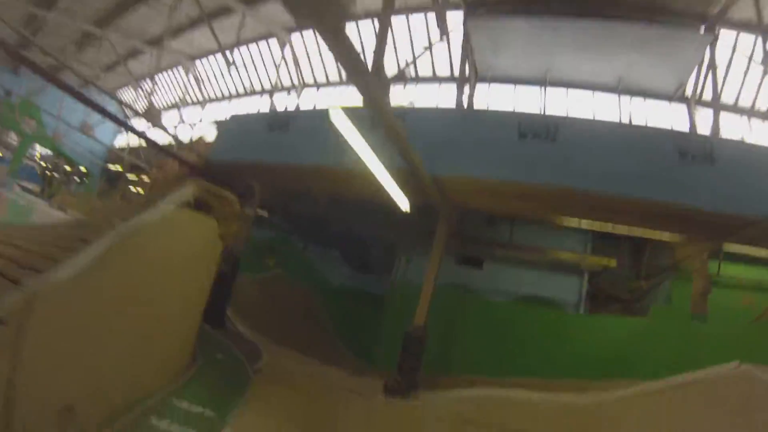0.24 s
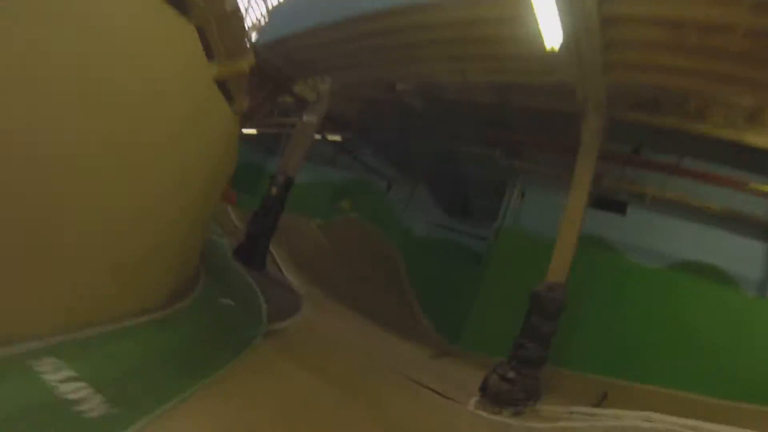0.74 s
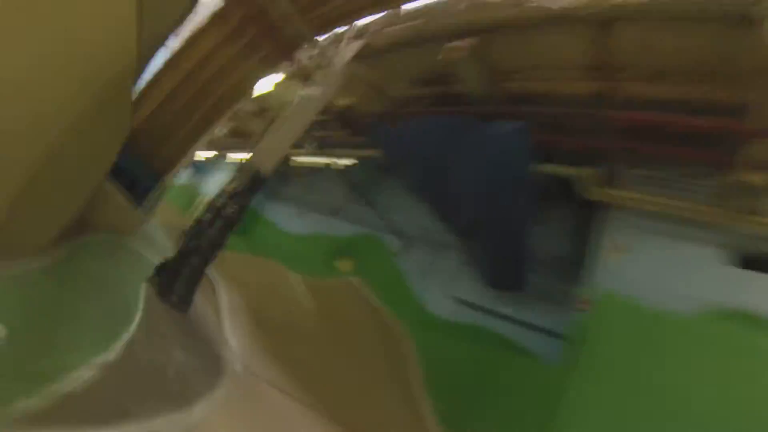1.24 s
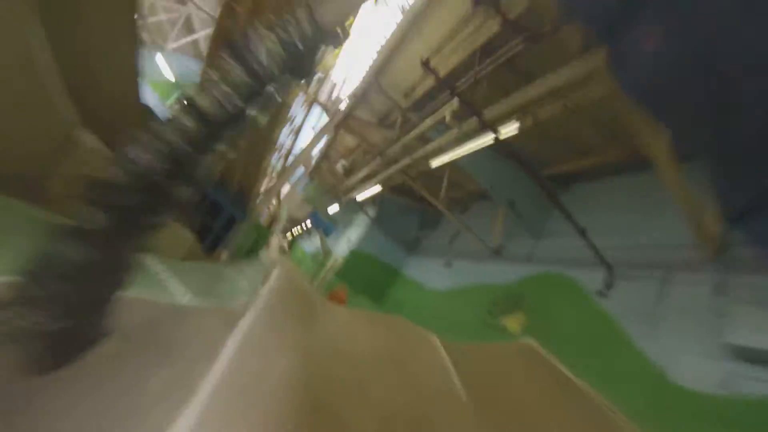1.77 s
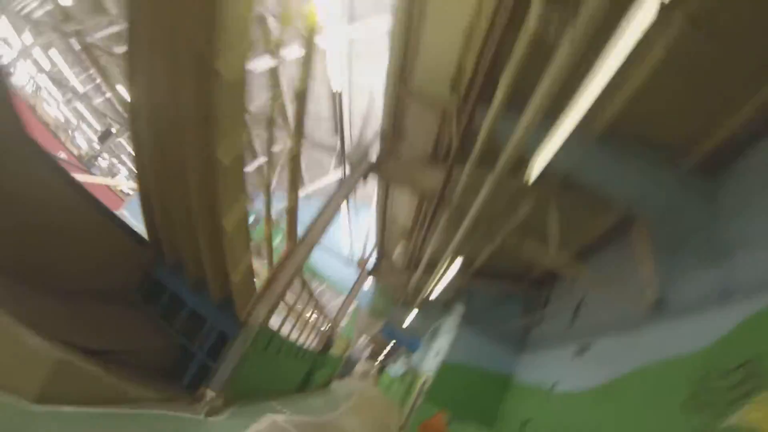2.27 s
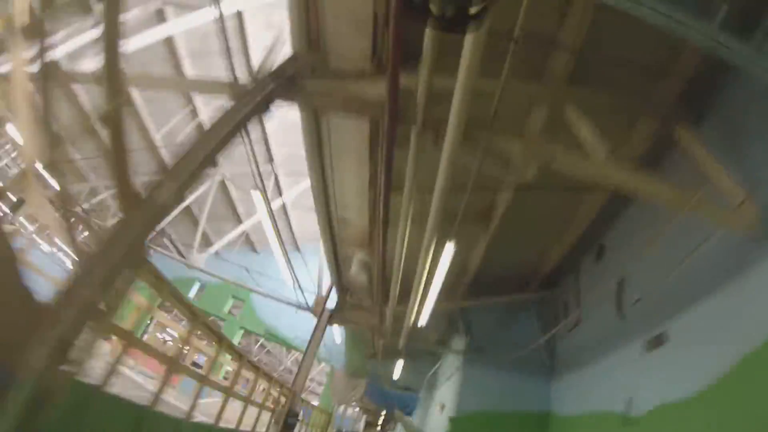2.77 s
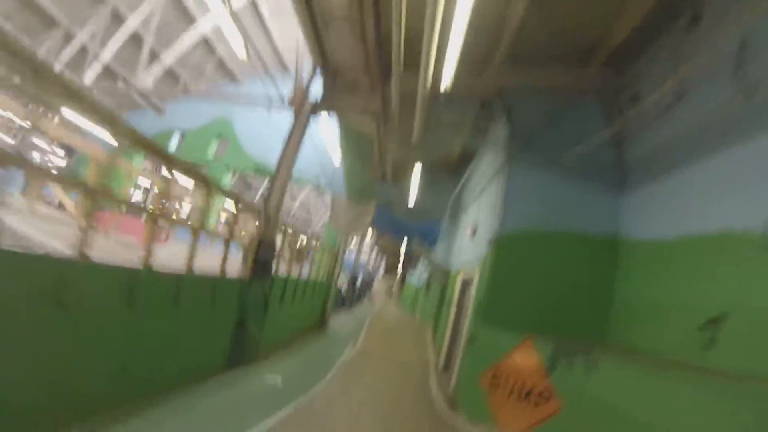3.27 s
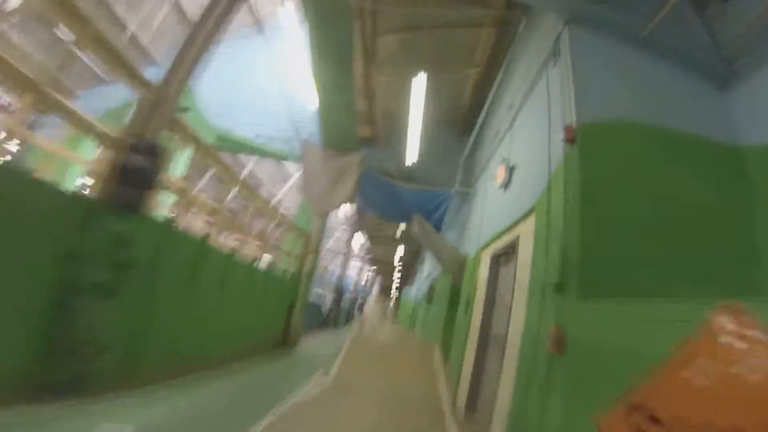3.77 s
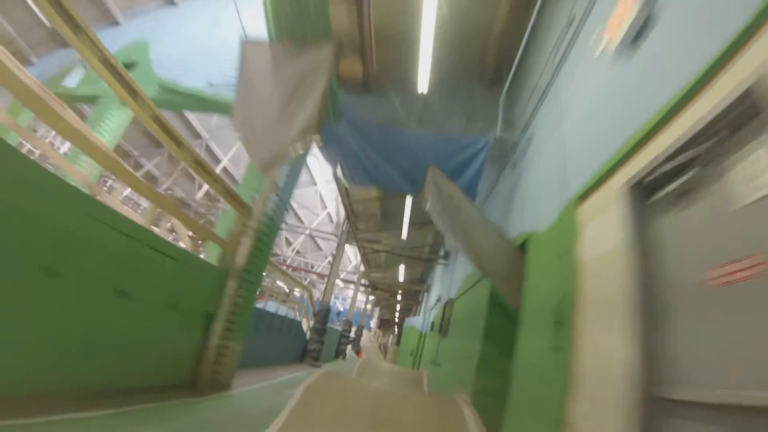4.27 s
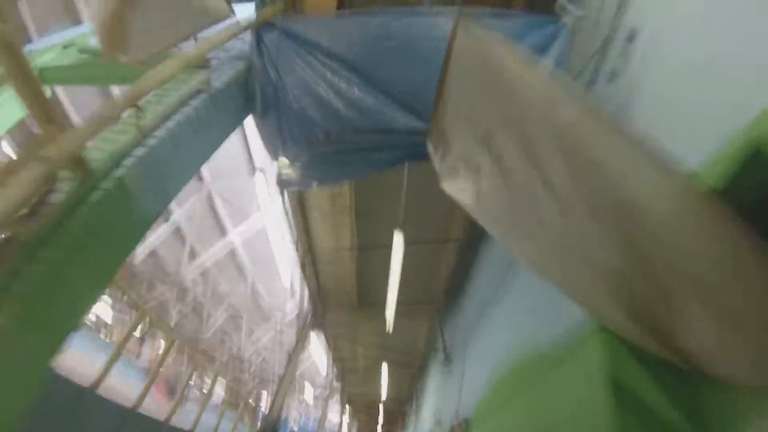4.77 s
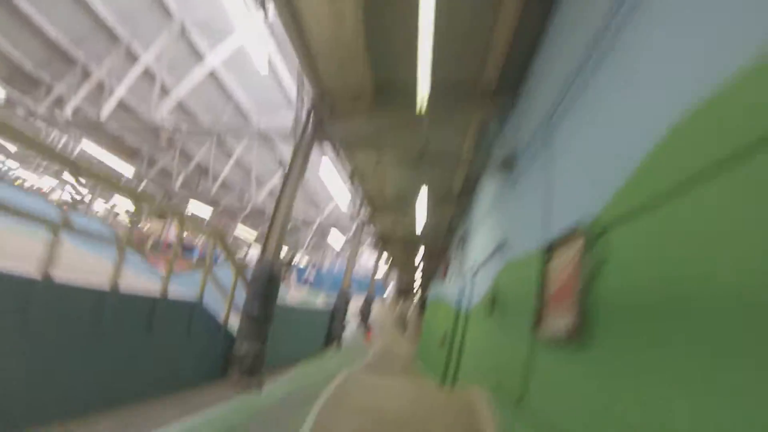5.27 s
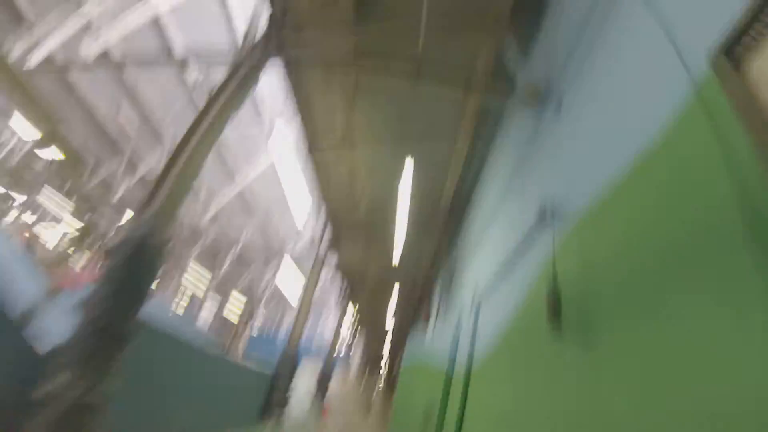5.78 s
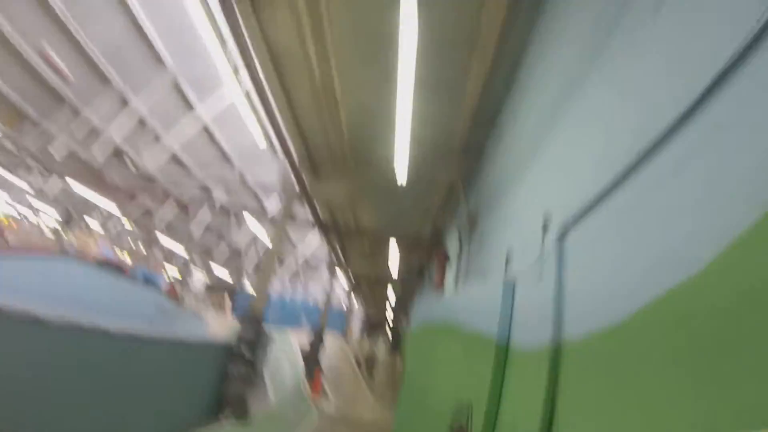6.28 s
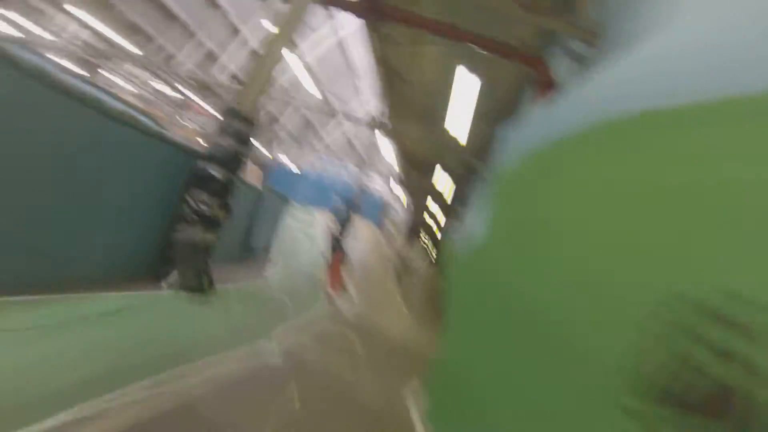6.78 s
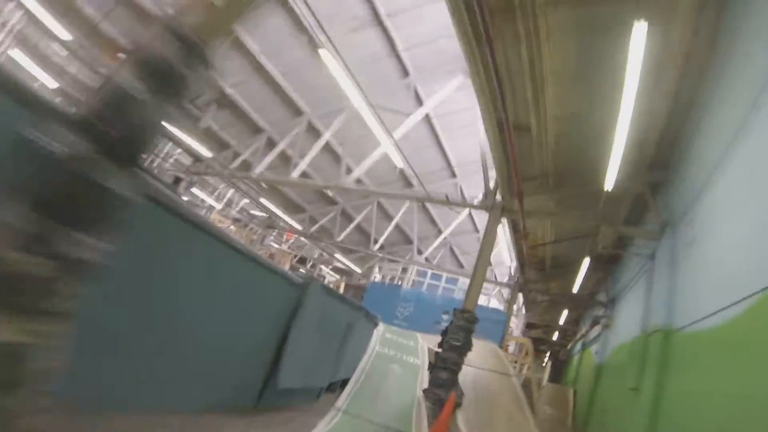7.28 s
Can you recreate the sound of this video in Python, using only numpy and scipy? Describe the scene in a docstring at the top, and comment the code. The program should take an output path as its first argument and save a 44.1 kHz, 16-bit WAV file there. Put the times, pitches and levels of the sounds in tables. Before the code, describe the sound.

A bicycle runs over wooden ramps and packed dirt in an indoor park, heard dry and close through a helmet camera's plastic housing. A rough hollow rumble opens and quickly sinks to a low, wavering murmur with faint hiss. From about 0.37 to 0.57 s a dense, loud burst of hollow knocks, rattling taps, ticks and a heavy board thump strikes, with a faint metallic ping. Lighter bumps follow, then from 1.05 to 2.3 s a jolting, chattering run with bright latch snaps. After a short dip, sharp knocks return around 2.65, 2.9 and 3.17 s. The ride then smooths, broken by impacts near 3.8 and 4.0 s and a rougher patch at 4.6-4.9 s. Quiet rolling follows until another clattering cluster at 5.6-6.0 s. It calms again, then knocks, a tick and snaps cluster near 7.07 s, and one firm hollow knock ends it at 7.48 s.

```python
"""A hollow rumble over a low murmur and faint hiss, soon joined by ticks, knocks, taps, snaps and pings.
A small camera in a closed plastic housing rides on a helmet down wooden ramps and packed dirt.
Tyre roughness and bumps come through rider and mount: filtered noise excites the shell's modes, a wandering
tone rocks the mount, and jolting noise chatters in the loose parts. Timed blows knock the shell, tap loose
parts, tick chain and cable, thump boards, snap the latch and ping a small metal part."""
import sys
import numpy as np
from scipy import signal
from scipy.fft import rfft, irfft, next_fast_len
from scipy.io import wavfile
from scipy.ndimage import uniform_filter1d

SR = 44100
rng = np.random.default_rng(int(sys.argv[2]) if len(sys.argv) > 2 else 0)


def transcribe(u):
    """Save the signal u as a 16-bit wav file named by the first command-line argument.

    u: samples, shape (n,) or (channels, n), limited to [-1, 1]; the rate is SR.
    q: integer samples, one column per channel.
    """
    v = np.clip(np.atleast_2d(u).T, -1, 1)
    q = np.round(v * 32767).astype(np.int16)
    wavfile.write(sys.argv[1], SR, q)


N = 331632


def gain_of(db):
    """Logarithmic level: decibels to an amplitude factor."""
    return 10 ** (np.asarray(db) / 20)


def evened(x):
    """Energy normalisation: scales to rms 1."""
    return x / np.sqrt(np.mean(x ** 2) + 1e-20)


def peaked(x):
    """Peak normalisation: scales to peak 1."""
    return x / (abs(x).max() + 1e-20)


def add(mix, start_s, sound):
    """Linear superposition: mixes a sound in at a time, cut at the end of the scene."""
    part = mix[round(start_s * SR):][:len(sound)]
    part += sound[:len(part)]


def band(x, lo_hz, hi_hz):
    """Band limiting: a steep causal band-pass."""
    return signal.sosfilt(signal.butter(4, [lo_hz, hi_hz], "bandpass", fs=SR, output="sos"), x)


def colour(x, points):
    """Spectral shaping: a curve interpolated over log frequency, closed beyond its ends; rms 1."""
    point_hz, point_db = np.transpose(points)
    size = next_fast_len(len(x))
    hz = np.fft.rfftfreq(size, 1 / SR)
    shape_db = np.interp(np.log(hz + 1), np.log(point_hz + 1), point_db, left=-90, right=-90)
    shaped = irfft(rfft(x, size) * gain_of(shape_db), size)
    return evened(shaped[:len(x)])


def ring(x, modes):
    """Modal superposition: two-pole resonances, each with gain set at its centre, added with alternating sign."""
    out = np.zeros(len(x))
    for k, (pitch_hz, width_hz, level_db) in enumerate(modes):
        r = np.exp(-np.pi * width_hz / SR)  # pole radius: a wider mode dies sooner
        poles = [1, -2 * r * np.cos(2 * np.pi * pitch_hz / SR), r * r]
        resonance = (1 - r) * signal.lfilter([1, 0, -1], poles, x)
        out += (-1) ** k * gain_of(level_db) * resonance
    return out


def grit(per_s, spread_db, smear_ms, steady):
    """Random impulsive excitation: noise jumps at small jolts and sinks back; steady is the share that never jumps."""
    jolt_db = spread_db * np.minimum(rng.exponential(1, N), 3.2)
    jolts = gain_of(jolt_db) * (rng.random(N) < per_s / SR)
    r = np.exp(-1000 / (smear_ms * SR))
    jumpy = evened(signal.lfilter([1], [1, -r], jolts))
    steady = np.clip(steady, 0, 1)
    return np.sqrt(steady + (1 - steady) * jumpy ** 2) * rng.standard_normal(N)


def puff(t60_ms):
    """Impact noise with exponential decay: a sharp crack and a burst that falls 60 dB in t60_ms."""
    t = np.arange(2400) / SR
    burst = gain_of(-60e3 * t / max(t60_ms, 3))
    crack = 3.6 * np.exp(-t / 0.0015)
    onset = 1 - np.exp(-t / 0.00076)
    return (burst + crack) * onset * rng.standard_normal(len(t))


# bumps that set the mount rocking: widest_s, level_db, t60_s
BUMPS = [(0.0, -27, 0.53), (0.387, -23, 0.64), (0.44, -15, 0.34), (0.51, -22, 0.15), (0.73, -31, 0.28),
         (1.14, -31, 0.22), (1.26, -26, 1), (1.359, -24.5, 0.66), (1.51, -24.5, 0.41), (1.718, -21.5, 0.47),
         (1.9, -26.5, 0.64), (2.07, -26.5, 0.66), (2.46, -40, 0.9), (2.67, -25, 0.64), (2.891, -25, 0.72),
         (2.96, -28, 0.24), (3.171, -26, 0.98), (3.268, -25, 0.19), (3.499, -33.5, .5), (3.67, -43, 0.13),
         (3.82, -29.5, 0.3), (4.008, -27, 0.38), (4.63, -28.5, 0.39), (4.79, -35.5, 1), (5.06, -53, 1),
         (5.38, -43, 0.25), (5.65, -37.5, 0.6), (5.78, -28.5, .4), (5.92, -29, 0.3), (6.1, -52, .2),
         (6.29, -40, .5), (6.58, -42, 0.17), (6.888, -38.5, 1), (7.09, -24.5, 0.44)]
SWING_RISE_S = 0.017  # time to build up by 10 dB


def swings():
    """Damped oscillation: power of the swing, building to each bump's widest point and dying away."""
    t = np.arange(N) / SR
    power = np.zeros(N)
    for widest_s, level_db, t60_s in BUMPS:
        part = slice(max(round((widest_s - .2) * SR), 0), round((widest_s + 1) * SR))
        late_s = t[part] - widest_s
        slope_db = np.where(late_s < 0, 10 * late_s / SWING_RISE_S, -60 * late_s / t60_s)
        power[part] += gain_of(level_db + slope_db) ** 2
    return power


# the ride: time_s, shell_rumble_db, loose_chatter_db
ROLL = [(0.0, -23, -48), (.04, -36.5, -66), (.16, -40, -65), (0.22, -49.5, -67), (0.36, -49, -64),
        (0.54, -30, -38.5), (0.75, -41.5, -58), (0.96, -38, -56), (1.13, -34.5, -53.5), (1.45, -35, -54.5),
        (1.63, -33.5, -43.5), (1.8, -29, -38.5), (2.08, -28, -45.5), (2.28, -34, -52), (2.4, -47.5, -61.5),
        (2.6, -39.5, -55.5), (2.8, -39.5, -49.5), (3.1, -44.5, -69), (3.42, -44.5, -66.5), (3.75, -36, -60),
        (3.87, -34.5, -51.5), (4.15, -40, -63), (4.58, -41, -63), (4.79, -31.5, -43.5), (4.96, -45, -62.5),
        (5.28, -46.5, -66.5), (5.63, -45, -60.5), (5.78, -26, -45), (5.86, -36.5, -54), (6.07, -43, -55),
        (6.55, -48, -70), (6.8, -42, -58.5), (6.95, -32.5, -55), (7.15, -34.5, -41.5), (7.27, -40, -65),
        (7.52, -48, -57)]
BUMP_RUMBLE_DB, BUMP_CHATTER_DB = -9, -20.5  # how much a swing adds to rumble and chatter


def ride(column, bump_db):
    """Power addition: level in dB of one column of the ride for every sample, lifted by the bumps."""
    rows = np.transpose(ROLL)
    rolling = gain_of(np.interp(np.arange(N) / SR, rows[0], rows[column]))
    return 10 * np.log10(rolling ** 2 + gain_of(bump_db) ** 2 * swings())


# lowest modes of the plastic shell, also rung by the knocks: pitch_hz, width_hz, level_db
SHELL = [(534, 88, 1.5), (661.5, 66, 1.5), (733.4, 97, 2.5), (939, 87, -8), (1088, 89, -26),
         (1295, 490, -13.5)]


def rumble():
    """Forced vibration: tyre roughness shakes the shell's lowest modes, smoothly when soft, jolting when loud."""
    level_db = ride(column=1, bump_db=BUMP_RUMBLE_DB)
    steady = 0.82 + (-38.5 - level_db) / 25
    shaken = ring(grit(93, 5.4, 5.3, steady), SHELL)
    low_roar = evened(band(shaken, 415, 884))
    high_roar = evened(band(shaken, 942, 1453))
    return gain_of(level_db) * evened(low_roar + gain_of(-18) * high_roar)


REST_DB, REST_WANDER_DB = -44.5, 2.5  # at rest the mount still trembles; rms of its level wander


def swing():
    """Amplitude modulation: how wide the mount rocks, a wandering tremble plus the swings in power."""
    wander = evened(uniform_filter1d(rng.standard_normal(N), size=3000))
    tremble = gain_of(REST_DB + REST_WANDER_DB * wander)
    return np.sqrt(tremble ** 2 + swings())


# spectrum of the low murmur around the rocking: pitch_hz, density_db (per Hz)
SWAY = [(12, -13), (22, -1), (30, -7), (42, -2.5), (55, -6.5), (70, -15.5), (90, -17.5), (130, -23.5)]
SWAY_HZ = 50.43  # mean pitch of the rocking


def sway():
    """Mass-spring resonance: the mount rocks on its pad, nearly a tone, in a low murmur."""
    wander = 1 + 0.093 * evened(uniform_filter1d(rng.standard_normal(N), size=2500))
    cycles = np.cumsum(SWAY_HZ * wander) / SR + rng.random()
    tone = np.sqrt(2) * np.sin(2 * np.pi * cycles)
    murmur = colour(rng.standard_normal(N), SWAY)
    return swing() * evened(tone + 1.09 * murmur)


# spectrum of the board drone: pitch_hz, density_db (per Hz)
THUD = [(90, -9), (130, -1.5), (180, 0.5), (245, -4), (310, -7), (400, -5.5), (460, -22)]
BOARDS_DB, BOARDS_FOLLOW = -48.5, 0.77  # level at a rumble of -39.5 dB; share of each rumble change


def boards():
    """Structure-borne sound: the boards drone above the sway, their level following the rumble."""
    drone = colour(grit(40, 1.6, 9.6, 0.51), THUD)
    level_db = BOARDS_DB + BOARDS_FOLLOW * (ride(column=1, bump_db=BUMP_RUMBLE_DB) + 39.5)
    return gain_of(level_db) * drone


# bands of the loose parts: low_hz, high_hz
PARTS = [(1100, 1900), (1800, 2600), (2500, 4200), (4000, 6200), (6000, 9500), (9000, 15000)]
# spectrum of the chatter: pitch_hz, density_db (per Hz)
CHATTER = [(650, -94.5), (1100, 8), (1440, -34), (2220, 1.5), (2750, -11), (3410, -3), (3910, -29.5),
           (5250, -8.5), (6150, -23.5), (7210, -16.5), (10000, -32), (12700, -22.5), (16500, -88)]
# upper modes of the housing, also rung by the knocks: pitch_hz, width_hz, level_db
UPPER = [(1576, 74, 9), (2110, 145, 11.5), (2980, 85, -5.5), (3500, 370, -3), (3600, 150, -29),
         (5480, 900, -25)]


def chatter():
    """Random superposition of impacts: each loose part clicks in its own band, and some jolts move them all."""
    level_db = ride(column=2, bump_db=BUMP_CHATTER_DB)
    steady = np.maximum((-46 - level_db) / 20, .15)  # on smooth ground the taps melt into a hiss
    own = np.zeros(N)
    for low_hz, high_hz in PARTS:
        clicks = evened(band(grit(80, 3.8, 2.0, steady), low_hz, high_hz))
        own += clicks * np.sqrt(high_hz - low_hz)  # power in proportion to bandwidth
    shared = grit(86, 3.08, 6.5, steady)
    taps = evened(own) + 0.65 * shared
    ringing = evened(ring(band(taps, 875, 4900), UPPER))
    return gain_of(level_db) * evened(colour(taps, CHATTER) + gain_of(0.5) * ringing)


# spectrum of the steady hiss: pitch_hz, density_db (per Hz)
HISS = [(650, -34), (1100, -10), (1320, -48), (1510, -60), (1630, 2), (1880, -14), (3570, -8), (4880, -12),
        (5400, -10), (6310, -19.5), (12200, -31), (12900, -49), (13400, -51), (16000, -47)]
HISS_DB = -70.5  # rms


def hiss():
    """Stationary noise: a faint hiss with a fixed spectrum and level."""
    return gain_of(HISS_DB) * colour(rng.standard_normal(N), HISS)


# thin ticks of chain and cable: start_s, level_db (peak)
TICKS = [(0.0484, -44), (0.097, -50), (0.296, -50), (0.4114, -28), (0.436, -23), (0.837, -49), (1.385, -38),
         (1.4076, -43), (1.549, -32), (1.911, -38), (2.24, -46), (3.326, -36), (3.3765, -49), (3.88, -39.5),
         (4.028, -47), (4.8049, -46), (5.0982, -50), (5.2676, -48.5), (5.7492, -44), (6.8836, -40),
         (7.0747, -25)]
TICK_MS = 70  # t60


def ticks():
    """Broadband impact: each tick of chain and cable is a thin, high puff of noise."""
    out = np.zeros(N)
    for start_s, level_db in TICKS:
        add(out, start_s, gain_of(level_db) * peaked(band(puff(TICK_MS), 2900, 12800)))
    return out


# blows on the shell: time_s (sound starts 1.5 ms before), level_db (main blow, peak), pitch_hz,
# upper_db (upper ring re level_db), length_ms
KNOCKS = [(0.05, -40, 527, -37, 3.6), (0.068, -21.5, 750, -23, 6), (0.112, -23, 650, -17, 5.5),
          (0.174, -28.5, 520, -14.5, 12), (0.366, -18, 680, -10, 8.7), (0.376, -6.5, 764, -3.5, 4.4),
          (0.382, -12, 840, -27, 3.4), (0.416, -6, 720, -15, 3), (0.434, -7, 536, -4, 4.4),
          (0.443, -15, 592, -20, 3.9), (0.45, -15, 735, -20, 4.5), (0.457, -10.5, 647, -14, 4.3),
          (0.484, -7.5, 590, -4, 3.9), (0.511, -15, 830, -18, 5.4), (0.516, -18, 755, -16, 6.7),
          (0.541, -4.5, 640, -23, 5), (0.564, -18, 573, -9, 7.2), (0.653, -19, 595, -11.5, 4.2),
          (0.768, -17.5, 850, -11.5, 5), (1.051, -24.5, 623, -19, 9.8), (1.092, -21, 560, -16, 5),
          (1.237, -8.5, 548, -18, 5.8), (1.264, -20, 746, -26, 5), (1.343, -11, 812, -3.5, 4.6),
          (1.394, -21.5, 756, -7.5, 4.4), (1.502, -22, 790, -24, 5.5), (1.52, -16, 567, -24, 4.4),
          (1.539, -15.5, 760, -5.5, 6), (1.558, -12, 600, -15, 4.4), (1.596, -22, 624, -9, 7.6),
          (1.686, -20, 550, -9, 5), (1.772, -22, 856, -9, 10), (1.804, -20, 573, -16, 3.5),
          (1.817, -16.5, 530, -12, 8.8), (1.847, -13.5, 545, -23, 5.3), (1.862, -17, 519, -28, 4.3),
          (1.989, -21.5, 543, -38, 6.1), (2.005, -22, 603, -17, 6.7), (2.014, -32, 598, -8, 4.3),
          (2.028, -22, 725, -23, 5), (2.042, -17.5, 507, -18, 5.4), (2.07, -19, 540, -30, 4.6),
          (2.089, -18, 708, -32, 3.2), (2.151, -21, 535, -22, 3.2), (2.24, -24, 690, -4.5, 5.9),
          (2.274, -22, 670, -25, 3.7), (2.609, -18.5, 710, -1, 5), (2.65, -19.5, 845, -7, 6.1),
          (2.665, -11, 570, -9.5, 7), (2.859, -13.5, 514, -25, 3.2), (2.869, -16, 689, -19, 4.5),
          (2.901, -4.5, 792, -20, 3.9), (2.914, -11, 534, -13, 2.4), (2.921, -15, 781, -19, 2.6),
          (3.144, -25, 655, -16, 9.2), (3.154, -12.5, 666, -15, 5.7), (3.183, -5.5, 716, -19, 7.6),
          (3.198, -17, 517, -18, 4.2), (3.264, -19.5, 805, -22, 4.6), (3.287, -19, 796, -7, 7.2),
          (3.494, -27, 740, -16, 5), (3.551, -25, 751, -12, 7.9), (3.806, -23, 524, 2, 5.3),
          (3.827, -15.5, 615, -5.5, 5.9), (3.856, -22, 690, -3, 5), (3.986, -22, 617, -6, 4.2),
          (3.998, -18, 573, -26, 3.1), (4.045, -27, 773, -6, 5.4), (4.612, -21, 586, -14, 5.8),
          (4.623, -24.5, 810, -7, 3.3), (4.657, -16.5, 660, -11, 4.6), (4.682, -20.5, 617, -8, 10.4),
          (4.703, -27, 770, -10, 6.4), (4.806, -21.5, 635, -15, 7.7), (4.864, -24.5, 910, -5.5, 3.6),
          (5.026, -23.5, 575, -13, 5), (5.625, -18.5, 783, -20.5, 6.6), (5.687, -16.5, 534, -19, 7.4),
          (5.699, -17.5, 860, -9.5, 5.9), (5.73, -9.5, 700, -16, 6.1), (5.742, -12, 760, -28, 4.1),
          (5.761, -18, 525, -24, 6.6), (5.897, -19.5, 570, -8, 5.8), (5.993, -22, 830, -7, 6.3),
          (6.171, -27.5, 580, -11, 8.3), (6.823, -27.5, 703, -9, 8.5), (6.839, -22.5, 530, -16, 4.1),
          (6.89, -24, 710, -9, 5), (6.999, -22, 760, -24, 8.2), (7.064, -25.5, 503, -10, 5.2),
          (7.082, -23.5, 760, 0, 5), (7.261, -25.5, 617, -21, 3.6), (7.479, -11.5, 607, -14.5, 4.9),
          (7.493, -16, 930, -23, 4.3)]


def knocks():
    """Impulse response of a shell: a soft blow swells and dies in a few cycles and leaves the modes ringing."""
    out, t = np.zeros(N), np.arange(2400) / SR
    for time_s, level_db, pitch_hz, upper_db, length_ms in KNOCKS:
        u = t / (0.00057 * max(length_ms, 1))
        swell = peaked(u ** 2.67 * np.exp(-3.5 * u))
        blow = swell * np.sin(2 * np.pi * (pitch_hz * t + rng.random()))
        tail = 0.56 * (1 - np.exp(-u)) * np.exp(-t / 0.015)
        rough = (swell + tail) * rng.standard_normal(len(t))
        shell = peaked(ring(band(rough, 396, 1354), SHELL))
        wide = band(rough, 920, 3440)  # a soft blow holds little treble
        upper = peaked(peaked(ring(wide, UPPER)) + 0.19 * peaked(wide))
        knock = gain_of(level_db) * peaked(blow + 0.64 * shell)
        add(out, time_s - .0015, knock + gain_of(level_db + upper_db) * upper)
    return out


# loose parts tapping: start_s, level_db (body), brightest_hz, treble_db (re level_db)
RATTLES = [(0.0817, -43, 2580, -20), (0.1285, -42, 2920, -11), (0.194, -37.5, 4780, -9),
           (0.376, -12.5, 2410, -15.5), (0.425, -14, 3650, -11.5), (0.4329, -18, 3820, -12.5),
           (0.4693, -16, 2600, -4), (0.488, -14.5, 2460, -18), (0.5107, -18, 2500, -15),
           (0.5284, -21, 2500, -20), (0.5428, -13, 3730, -15), (0.6137, -27, 3370, -24),
           (0.6838, -30.5, 3500, -27), (0.724, -31.5, 2350, -28), (0.7642, -28, 2570, -11.5),
           (0.9003, -38, 2400, -21), (1.0145, -35, 2470, -25), (1.057, -38, 3480, -25),
           (1.1064, -24.5, 3270, -25), (1.1426, -28.5, 2350, -30), (1.2361, -24, 2400, -28),
           (1.274, -31.5, 2500, -8.5), (1.312, -23.5, 3000, -26), (1.3428, -15.5, 2400, -15),
           (1.393, -24.5, 3320, -21), (1.5195, -24, 3580, -14), (1.5414, -18, 2380, -12),
           (1.5937, -25, 3300, -10), (1.6551, -41, 2420, 2), (1.718, -26.5, 2780, -9),
           (1.7607, -22, 2990, -20), (1.785, -24.5, 3380, -13.5), (1.8382, -26.5, 2520, -7.5),
           (1.9054, -32, 3560, -14), (1.921, -29, 3400, -28), (1.999, -29.5, 2780, -1),
           (2.0168, -23, 4300, -8.5), (2.05, -28, 3470, -10), (2.1126, -31, 2410, -30),
           (2.151, -30, 2830, -15), (2.2039, -38, 2590, -8), (2.2513, -28.5, 2370, -20),
           (2.606, -28.5, 2420, -13), (2.618, -29, 2980, -14), (2.6459, -24, 2440, -17),
           (2.6615, -19, 2470, -19), (2.725, -26.5, 3270, -36), (2.742, -34, 3380, -30),
           (2.7676, -32, 2560, -25), (2.809, -33, 4520, -10), (2.8746, -27.5, 2750, -12),
           (2.892, -23, 2420, -31), (2.916, -22.5, 2400, -21), (2.9657, -26, 2540, -30),
           (2.9851, -33, 2610, -25), (3.035, -30.5, 2310, -26), (3.0565, -34, 2990, -8),
           (3.1578, -23, 3800, -11), (3.236, -26, 3450, -24), (3.2548, -23, 2400, -18),
           (3.2936, -25.5, 2530, -29), (3.3113, -29, 3280, -30), (3.5386, -34.5, 2430, -14),
           (3.6416, -41, 3080, -10), (3.7918, -36.5, 2430, -30), (3.8102, -26, 2420, -11),
           (3.8514, -27, 2540, -13), (3.924, -33.5, 3500, -37), (3.9907, -23, 3700, -8),
           (4.0173, -32, 3380, -20), (4.054, -30.5, 3300, -26), (4.6568, -26, 2410, -12.5),
           (4.7017, -32, 2410, -17), (4.7431, -37, 3460, -25), (4.7764, -41, 2400, -28),
           (4.8024, -37, 2470, -14), (4.847, -25, 3230, -36), (4.879, -25.5, 3450, -30),
           (5.689, -31.5, 2510, -13), (5.699, -30, 3380, -17), (5.7404, -22, 2500, -18),
           (5.7823, -28.5, 2460, -25), (5.8554, -23.5, 2570, -34), (5.8994, -27, 4640, -9),
           (5.915, -19.5, 3270, -37), (5.938, -25, 3360, -29), (5.9793, -30.5, 3870, -18),
           (6.0653, -34, 4650, -12.5), (6.82, -36.5, 3480, -18), (6.8754, -25.5, 3260, -13.5),
           (6.9142, -33, 2540, -27), (6.992, -33.5, 3300, -37), (7.0688, -24.5, 3310, -7.5),
           (7.1072, -32, 2400, -15), (7.1422, -30, 3500, -31), (7.319, -41, 2370, -31),
           (7.4798, -25.5, 2430, -18)]
# modes shared by the loose parts: pitch_hz, width_hz, level_db
PART_MODES = [(2150, 450, 22.5), (3450, 320, -7), (4530, 150, -22), (5410, 150, 7)]
TAP_MS, TAP_MS_PER_DB = 45, 2.5  # t60 of a -38.5 dB tap, longer when harder
TOP_DB = -9.5  # top hiss re treble


def rattles():
    """Contact impact: each tap is a sharp puff with a brightest region of its own and more or less treble."""
    out = np.zeros(N)
    for start_s, level_db, brightest_hz, treble_db in RATTLES:
        burst = puff(TAP_MS + TAP_MS_PER_DB * (level_db + 38.5))
        body = band(burst, 1000, 5250)
        own = peaked(ring(body, [(brightest_hz, 350, 0)]))
        shared = peaked(ring(body, PART_MODES))
        tap = .3 * peaked(body) + 0.37 * own + 0.42 * shared
        treble = peaked(band(burst, 5000, 9200))
        top = peaked(band(burst, 9000, 14000))
        tap += gain_of(treble_db) * (treble + gain_of(TOP_DB) * top)
        add(out, start_s, gain_of(level_db) * tap)
    return out


# a wheel dropping on a board: start_s, level_db (board tone), pitch_hz
THUMPS = [(0.368, -23.5, 155), (0.426, -7.5, 242), (1.009, -29, 238), (1.086, -26, 215), (1.119, -26, 243),
          (1.52, -23, 295), (1.714, -26.5, 343), (1.845, -21.5, 267), (2.012, -21.5, 297),
          (2.652, -27, 275), (3.157, -31.5, 314), (3.992, -37, 263), (4.682, -26.5, 163), (4.803, -28, 242),
          (4.881, -35, 182), (7.067, -28, 252)]
BEAM_HZ = 102  # low note of the ramp beams


def thumps():
    """Damped bending vibration: a board and its beam answer with a few low cycles."""
    out, t = np.zeros(N), np.arange(3000) / SR
    u = t / 0.0036
    envelope = u * np.exp(1 - u)  # peaks at 1 after 3.6 ms
    beam = 0.55 * np.sin(2 * np.pi * BEAM_HZ * t)
    for start_s, level_db, pitch_hz in THUMPS:
        board = np.sin(2 * np.pi * pitch_hz * t)
        add(out, start_s, gain_of(level_db) * envelope * -(board + beam))
    return out


# the latch snapping in its play: time_s (sound starts 0.31 ms after), level_db (peak)
SNAPS = [(0.4206, -21), (1.3579, -20), (1.522, -15), (1.719, -18), (1.7693, -31), (2.0498, -27),
         (2.6616, -17), (2.8748, -21), (2.9354, -40), (3.1579, -16), (3.269, -19.5), (3.9923, -12.5),
         (5.7914, -22), (5.9012, -15.5), (7.068, -18.5), (7.1174, -26)]
# resonance of the tiny cavity: pitch_hz, width_hz, level_db
CAVITY = [(12700, 1900, 0)]
# modes of the latch body: pitch_hz, width_hz, level_db
LATCH = [(6900, 570, -12), (4730, 380, 2), (3600, 300, 1)]
LATCH_DB = -15  # latch body re cavity


def snaps():
    """Cavity resonance: a hard tick by the microphone rings a tiny bright cavity; a looser rebound follows."""
    out, t = np.zeros(N), np.arange(600) / SR
    for time_s, level_db in SNAPS:
        tick = (t == 0) + 0.15 * np.exp(-t / 0.00029) * rng.standard_normal(len(t))
        cavity = peaked(ring(ring(tick, CAVITY), CAVITY))
        body = peaked(band(ring(tick, LATCH), 1400, 6600))
        click = peaked(cavity + gain_of(LATCH_DB) * body)
        rebound = peaked(band(puff(30), 3000, 13500))
        add(out, time_s + 0.00031, gain_of(level_db) * click)
        add(out, time_s + 0.0064, gain_of(level_db - 25) * rebound)
    return out


# a small metal part pinging: start_s, level_db (upper mode), lower_db (lower mode re upper)
PINGS = [(0.487, -49, -20), (.635, -60, -20), (1.385, -66, -7), (2.92, -64, -35), (3.325, -60, 10),
         (3.494, -52.5, -18), (4.068, -60, -18), (6.887, -61, -16), (7.075, -60, -22)]
PING_HZ, PING_T60_S = 9527, .2  # upper mode
LOWER_HZ, LOWER_T60_S = 7536, .1  # lower mode


def pings():
    """Free vibration with exponential decay: two thin metal modes dying away."""
    out, t = np.zeros(N), np.arange(9000) / SR
    for start_s, level_db, lower_db in PINGS:
        upper = gain_of(-60 * t / PING_T60_S) * np.sin(2 * np.pi * PING_HZ * t)
        lower = gain_of(lower_db - 60 * t / LOWER_T60_S) * np.sin(2 * np.pi * LOWER_HZ * t)
        add(out, start_s, gain_of(level_db) * (upper + lower))
    return out


def scene():
    """Superposition at one point: all sources sum at one microphone, over the faint steady hiss."""
    steady_layers = rumble() + sway() + boards() + chatter() + hiss()
    events = ticks() + knocks() + rattles() + thumps() + snaps() + pings()
    return (steady_layers + events)[None]


EDGE_HZ = 16580  # upper band limit


def record(dry):
    """Low-pass filtering: the band limit of the recorder, without delay."""
    low_pass = signal.firwin(511, EDGE_HZ, window=("kaiser", 9), fs=SR)
    return signal.oaconvolve(dry, low_pass[None], "same")


dry = scene()
out = record(dry)
transcribe(out)
```